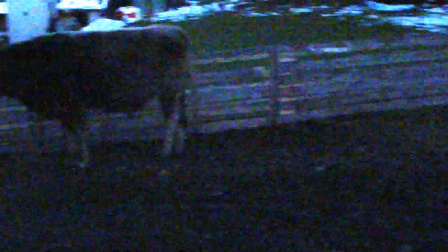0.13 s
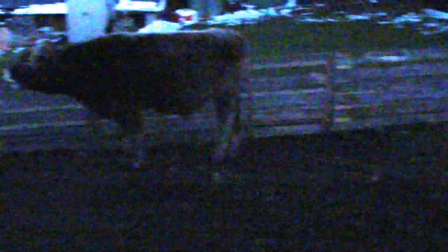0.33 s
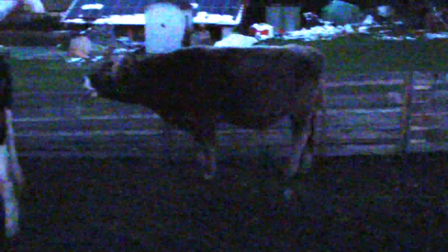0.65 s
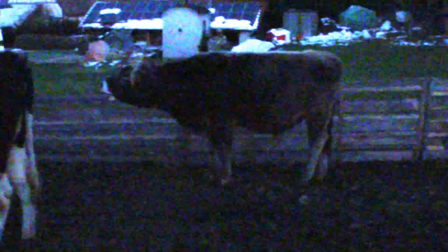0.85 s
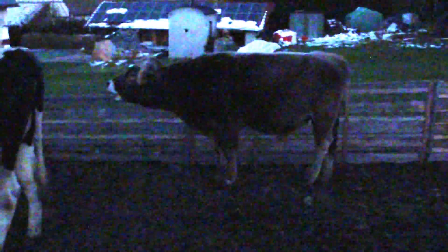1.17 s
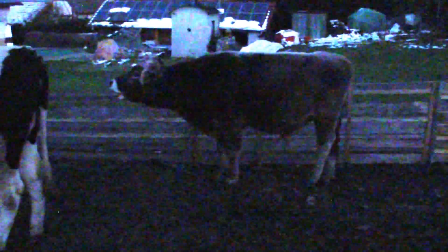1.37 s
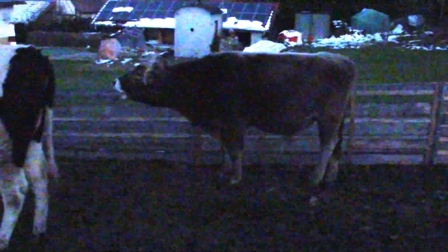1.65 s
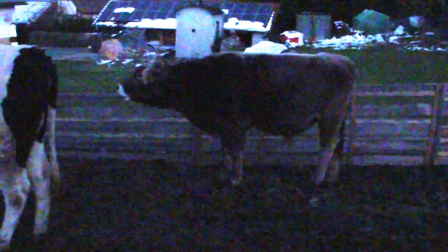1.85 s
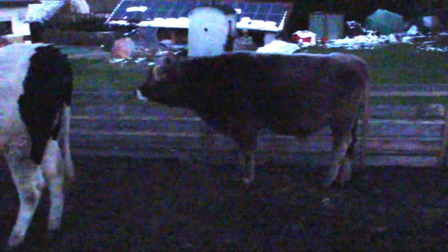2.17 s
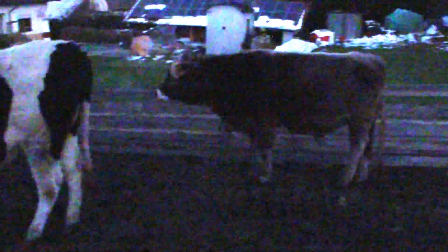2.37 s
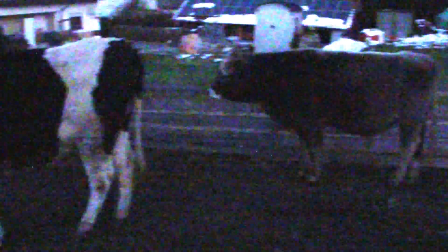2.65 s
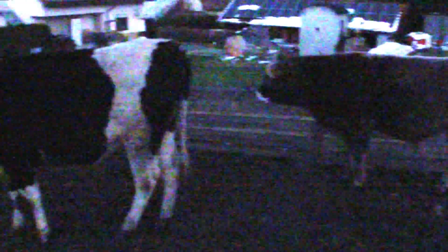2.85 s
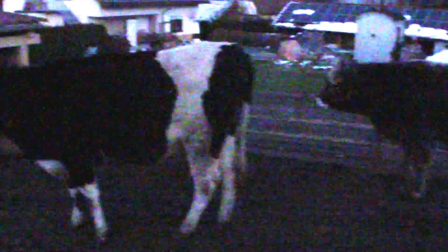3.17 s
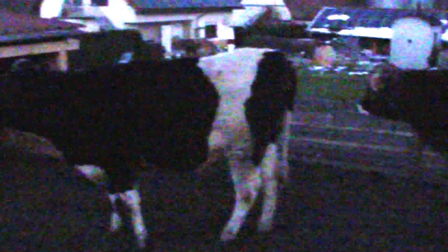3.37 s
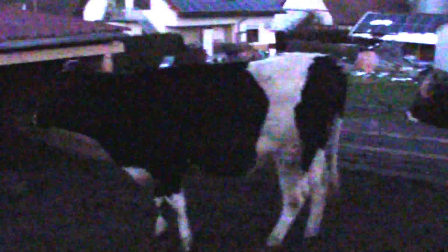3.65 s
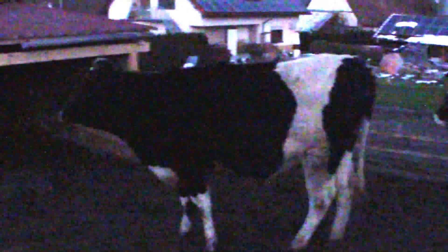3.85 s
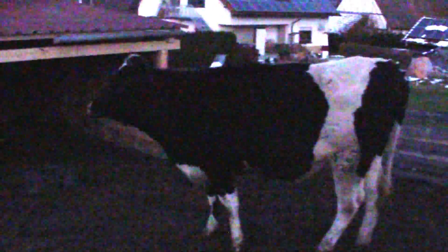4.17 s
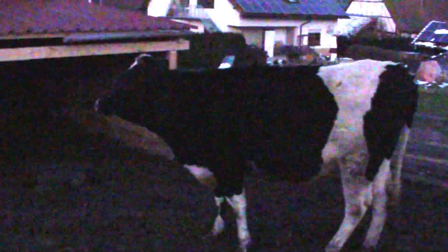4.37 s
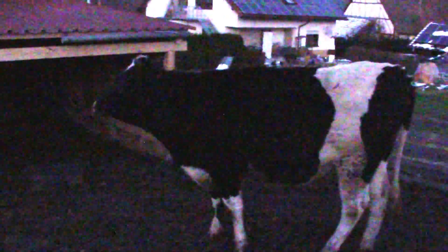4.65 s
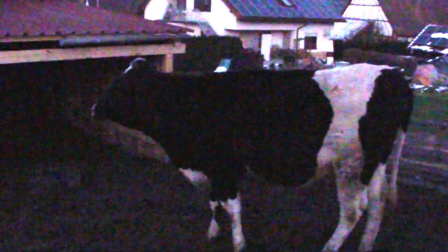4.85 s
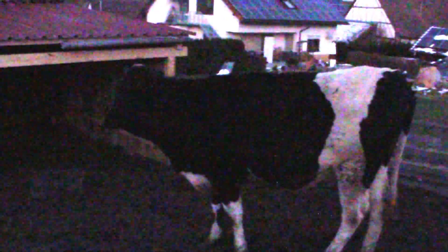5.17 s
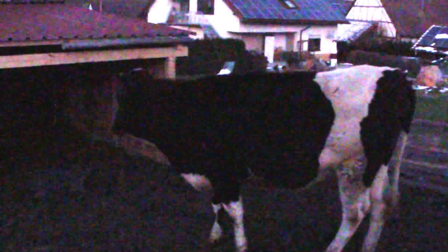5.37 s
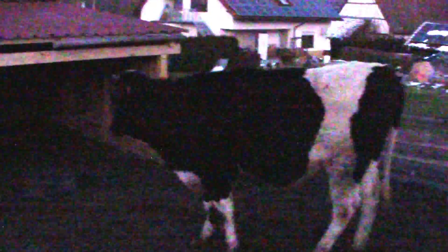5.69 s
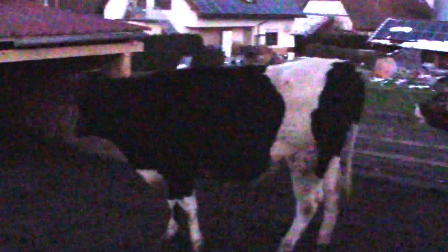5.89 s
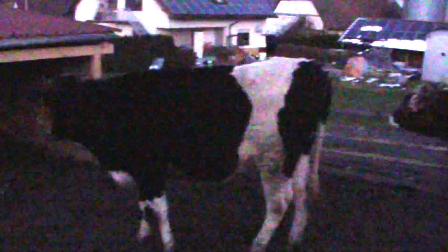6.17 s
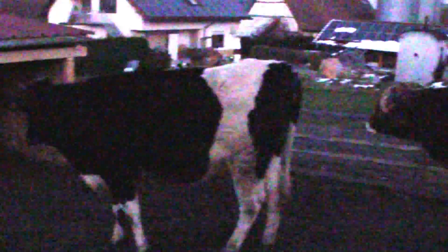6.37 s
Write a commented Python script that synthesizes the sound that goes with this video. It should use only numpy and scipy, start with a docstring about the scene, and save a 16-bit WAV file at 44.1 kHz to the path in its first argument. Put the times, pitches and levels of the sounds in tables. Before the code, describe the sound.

Outdoors in a quiet farmyard, one strong, slightly rough moo is already sounding at the start, climbs and falls away. After a pause with light hoof taps and tiny dry rustles comes another long moo, steadier on its high note, ending in a quick drop. Light echoes return from the surroundings. The stereo pickup is modest, with thin bass, hiss and a weak electronic whine.

```python
"""Two lows of a cow in an open farmyard at dusk, over a far traffic murmur, recorder hiss and a thin whine.
From 0 to 1.9 s the first moo glides up, holds and breaks off downward: partials of the vocal-fold pulse
shaped by throat resonances, with breath in the treble. Near 2.4 s hooves knock as decaying resonances;
short noise rustles fall between the calls. From 4.1 to 5.9 s the second moo opens with a faint hum and
follows the same course. Feedback loops return calls and knocks as echoes from walls and sheds."""
import sys
import numpy as np
from scipy import signal
from scipy.fft import rfft, irfft, next_fast_len
from scipy.io import wavfile
from scipy.ndimage import uniform_filter1d

SR = 44100
rng = np.random.default_rng(int(sys.argv[2]) if len(sys.argv) > 2 else 0)


def dump_mix(stems):
    """Bounce the given channels to the path in sys.argv[1] as a 16-bit WAV at rate SR."""
    frames = np.atleast_2d(stems).T  # one column per channel
    limited = np.clip(frames, -1, 1)  # hard clip at full scale
    pcm = np.round(limited * 32767).astype(np.int16)
    wavfile.write(sys.argv[1], SR, pcm)


N = 287840
TIME = np.arange(N) / SR

# spectrum of distant murmur below 3 kHz and hiss above: (frequency [Hz], relative density [dB per Hz])
AIR_SPECTRUM = [(30, -31), (70, -19.5), (150, -8), (350, -1), (520, 0.5), (720, 3.5), (950, -0.5),
                (1250, -5), (1800, -7), (2800, -14.5), (4500, -22.5), (6500, -18.5), (10000, -21.5),
                (13000, -27), (15500, -35)]
# course of murmur and hiss: (time [s], level [dB])
AIR_LEVEL = [(0, -38), (2.3, -49.5), (4.1, -50.5), (6.0, -48), (6.53, -48.5)]
# steady tones of the recorder electronics: (frequency [Hz], rms level [dB])
WHINE_TONES = [(6788, -87), (7800, -80), (7827, -81), (7849, -88), (15622, -100)]
# brief treble rustles: (time [s], standard deviation of the bell [s], rms level at its top [dB])
RUSTLE_EVENTS = [(2.05, .014, -53), (2.515, .005, -60), (3.28, .02, -65), (3.47, .012, -67),
                 (4.08, .006, -59)]
# hooves and small knocks: (time [s], level before decay and soft start [dB], ring [Hz], t60 [s])
KNOCK_EVENTS = [(2.398, -28, 450, 0.022), (2.4485, -38, 764, .02), (2.512, -32.5, 1280, 0.014),
                (2.5157, -27.5, 1950, 0.0064)]
# echoes of the yard: (frequency [Hz], t60 [s], gain [dB])
YARD_BANDS = [(100, 0.29, -26), (247, 0.83, -17), (603, 0.37, -13.5), (1318, 0.65, -20.5), (2700, 0.45, -4),
              (6000, 0.68, -17), (16000, .1, -17.5)]
# band stops of the recorder: (centre [Hz], width [Hz])
BAND_STOPS = [(3000, 1300), (4000, 1940), (5000, 670), (12000, 2100), (12400, 3000), (13500, 5800)]
# course of each moo: (time [s], pitch [Hz], ring level near 1.2 kHz [dB], chest partials [dB re ring],
# treble [dB re ring], lip resonance [Hz])
MOO_COURSES = [
    [(0.0, 147, -14, -2, -32, 6450), (0.02, 145.9, -21, -6, -44, 6700),
     (0.306, 168.1, -17.5, -0.5, -40, 6400), (0.348, 173.3, -17.5, -5.5, -39, 5970),
     (0.522, 180.2, -15.5, -3, -34.5, 5850), (0.582, 190.4, -16.5, -1.5, -33, 5870),
     (0.65, 194.2, -13.5, -7, -36.5, 6760), (0.746, 200.2, -16.5, -5.5, -39.5, 6580),
     (1.058, 206, -18, -3.5, -32.5, 6140), (1.364, 203.4, -16, -5.5, -34, 6230),
     (1.518, 193.7, -18, -7, -38.5, 6010), (1.614, 189, -18.5, -0.5, -27, 6060),
     (1.692, 175.1, -13, -10, -36, 6250), (1.734, 168, -18.5, -0.5, -35, 6100),
     (1.782, 141.9, -19.5, -2, -32.5, 6400), (1.84, 101.5, -23, -1, -27.5, 6670),
     (1.9, 84.4, -43, -3, -22, 6510)],
    [(4.12, 92.9, -70.5, 7, -6, 6420), (4.214, 128.4, -32.5, -3.5, -27.5, 6900),
     (4.284, 153.4, -19.5, -6, -36, 6540), (4.33, 167, -20, 0.5, -29.5, 6140),
     (4.364, 176.2, -16, -2, -35.5, 6040), (4.474, 196.2, -18, -1.5, -32, 6540),
     (4.536, 199.7, -17, -6.5, -33.5, 6900), (4.64, 208.2, -17, 1, -26.5, 6690),
     (4.816, 205.7, -16, -1.5, -28, 6610), (5.106, 209, -16.5, -3, -29.5, 6806),
     (5.232, 209.4, -16.5, -2, -26.5, 5980), (5.668, 205.1, -15.5, -5.5, -27.5, 6120),
     (5.744, 198.8, -18.5, -10, -32, 6060), (5.788, 193.5, -14.5, 0, -35, 6100),
     (5.808, 175.8, -17.5, -0.5, -24.5, 6270), (5.864, 117.1, -21.5, -6, -29, 6320),
     (5.92, 90.46, -35.5, 2, -29, 6290)],
]
# resonances with the mouth wide, one set a moo, widths before the skirt shaping in throat_gain:
# (centre [Hz], nominal width [Hz], gain [dB])
WIDE_MOUTHS = [
    [(537, 23, 3.5), (666, 58, 7), (976, 94, 6.5), (1221, 37.5, 16.5), (1585, 29, 5), (1785, 64, 5),
     (2386, 80, -12), (2500, 100, -55), (3480, 740, -45), (4650, 300, -43.5)],
    [(438, 210, -7), (671, 110, 0.5), (1051.3, 46, 9), (1205.4, 49.3, 7.5), (1709, 60, 1), (1978, 157, -11),
     (2360, 98, -11), (2830, 260, -27), (3720, 220, -30.5), (4650, 530, -45.5)],
]
# resonances with the mouth half open, at low pitch: (centre [Hz], nominal width [Hz], gain [dB])
HALF_OPEN_MOUTH = [(417, 270, -9.5), (708.5, 58, 1.5), (891, 93, -1.5), (1204, 48, 6.5), (1583, 65, -5.5),
                   (1857, 112, -2.5), (2340, 393, -20), (3830, 150, -45)]
# treble of buzz and breath: (frequency [Hz], relative density [dB per Hz])
BREATH_SPECTRUM = [(2500, -6.5), (3600, -22), (4600, -20.5), (5700, -2.5), (6900, -5.5), (8000, -10.5),
                   (9200, -7), (11000, -10.5), (13000, -28.5), (15500, -25)]
# moments when the voice catches; a negative drop is a rise:
# (time [s], standard deviation of the bell [s], added roughness [0-1], drop [dB])
VOICE_CATCHES = [(0.325, 0.022, .06, -0.5), (0.476, 0.0051, 0.17, 4.5), (0.545, 0.029, .25, 3),
                 (0.863, 0.0096, 0.39, 2.5), (1.114, 0.11, 0.17, -1), (1.633, 0.0096, .15, 4),
                 (4.995, 0.2, 0.05, 0), (5.801, 0.019, .12, 4.5)]
# character of each moo: (steady roughness [0-1], upper partials [dB re ring],
# first partial offset [dB], second partial offset [dB])
MOO_CHARACTERS = [(.04, -10, 0, 1), (0.11, -11.5, 2.5, 2)]
# strength of the lowest partials against pitch:
# (pitch [Hz], first partial [dB re ring], second partial [dB re ring])
LOW_PARTIAL_LEVELS = [(88, -32, -17), (129.6, -36, -5), (157, -27.5, -18), (164.6, -26, -24),
                      (181.2, -18.5, -14), (205.9, -10, -12.5), (212.2, -20, -11)]

AIR_LIKENESS = 0.25  # share of noise power common to both microphones
BASS_CUT_HZ, CUTOFF_HZ = 90, 15760
COW_LEFT_DB, HISS_LEFT_DB = 1, 2.5  # left above right: whole call, and further its treble
BUZZ_SHARE = .6  # share of treble power that follows the pitch as partials
LIPS_HALF_WIDTH_HZ, LIPS_DB = 56, 7.5  # boost in dB halves at this distance from the centre
OPEN_FROM_HZ, OPEN_AT_HZ = 177, 201.6  # pitches between which the mouth opens wide
ROUGH_PER_GLIDE = .035  # added roughness per octave a second
SECOND_DB_PER_RISE, UPPER_DB_PER_GLIDE = -2, 0.7  # dB per octave a second
LOW_WAVER_DB = 2.0  # rms waver of the two lowest partials
SWELL_S, SWELL_LENGTH_S, SWELL_DB = 4.57, 0.13, 5  # first partial of the second moo
HUM_FROM_S, HUM_TO_S, OPENING_S = 4.1, 4.222, .022  # closed lips, and the time they take to part
HUM_DB, HUM_LOW_DB = -54, 14  # ring level of the hum; boost of its two lowest partials
LEFT_RIGHT = np.array([[.5], [-.5]])


def from_db(db):
    """Amplitude gain is a power of ten of level over 20 dB."""
    return 10 ** (np.asarray(db) / 20)


def rms_one(x):
    """Normalisation divides a signal by its root mean square."""
    return x / np.sqrt(np.mean(x ** 2) + 1e-20)


def at_hz(points, hz, column=1):
    """Interpolation on a logarithmic frequency axis reads a table column."""
    points = np.array(points)
    return np.interp(np.log(hz + 1), np.log(points[:, 0]), points[:, column])


def drift(rate_hz, size):
    """Two equal poles smooth white noise into a slow random course of rms 1."""
    r = np.exp(-2 * np.pi * rate_hz / SR)
    noise = rng.standard_normal(size + SR)
    return rms_one(signal.lfilter([1], [1, -2 * r, r * r], noise)[SR:])  # filter settles first


def running_rms(x):
    """A moving mean of power over 34 ms, a few pitch cycles, gives the level."""
    return np.sqrt(uniform_filter1d(x ** 2, size=1500) + 1e-12)


def coloured(spectrum, channels):
    """Spectral weighting of white noise gives coloured noise of rms 1."""
    size = next_fast_len(N)
    gain = from_db(at_hz(spectrum, np.fft.rfftfreq(size, 1 / SR)))
    white = rng.standard_normal((channels, size))
    return rms_one(irfft(rfft(white) * gain, size)[:, :N])


def above(hz, edge_hz):
    """A linear crossover 100 Hz wide steps from 0 to 1 at an edge."""
    return np.clip((hz - edge_hz) / 100 + .5, 0, 1)


def bump(t, s, length):
    """A Gaussian bell marks a brief moment."""
    return np.exp(-.5 * ((t - s) / length) ** 2)


def air():
    """Partly correlated noise makes a wavering distant murmur and hiss; steady sines add whine."""
    noise = coloured(AIR_SPECTRUM, channels=3)
    murmur = np.sqrt(AIR_LIKENESS) * noise[0] + np.sqrt(1 - AIR_LIKENESS) * noise[1:]
    level_db = np.interp(TIME, *np.transpose(AIR_LEVEL)) + drift(3.8, size=N)
    whine = sum(from_db(db) * np.sqrt(2) * np.sin(2 * np.pi * hz * TIME) for hz, db in WHINE_TONES)
    return from_db(level_db) * murmur + whine


def rustles():
    """Bell-shaped envelopes gate bright noise into short puffs."""
    swell = sum(from_db(db) * bump(TIME, s, length) for s, length, db in RUSTLE_EVENTS)
    return swell * coloured([(2000, -30), (5000, 17), (10000, 15), (16000, -34)], channels=2)


def yard(x):
    """Recirculating delays, two dozen a side, echo as between buildings; each band has its own decay."""
    size = next_fast_len(N + SR)
    hz = np.fft.rfftfreq(size, 1 / SR)
    t60 = at_hz(YARD_BANDS, hz)
    echoes = np.zeros((2, len(hz)), complex)
    for k, lag in enumerate(rng.uniform(.025, .13, 48)):
        loop = from_db(-60 * lag / t60) * np.exp(-2j * np.pi * hz * lag)
        echoes[k % 2] += (-1) ** (k // 2) * loop / (1 - loop)
    apart = hz / np.hypot(hz, 900)  # long waves reach both microphones alike
    echoes = echoes.mean(axis=0) + 0.28 * apart * (echoes - echoes[::-1])
    gain = from_db(at_hz(YARD_BANDS, hz, column=2))
    return irfft(rfft(x, size) * echoes * gain, size)[:, :N]


def knocks():
    """A damped resonance, with a soft start, sounds each hoof or small knock."""
    out = np.zeros(N)
    for s, db, hz, t60 in KNOCK_EVENTS:
        age = np.clip(TIME - s, 0, None)
        onset = 1 - np.exp(-1.5 * hz * age)
        out += from_db(db - 60 * age / t60) * np.sin(2 * np.pi * hz * age) * onset
    return out


def throat_gain(modes, hz):
    """Parallel resonances of alternating sign and steep skirts leave deep valleys between peaks."""
    total = 0
    for k, (centre_hz, width_hz, db) in enumerate(modes):
        detuning = (hz - centre_hz ** 2 / hz) / width_hz
        total = total + (-1) ** k * from_db(db) / (1 + .7j * detuning) ** 1.267
    return total


def voiced_bands(t, hz, phase, wide, modes):
    """Source-filter principle: the mouth shapes harmonics, which are summed as chest, middle and upper."""
    chest, middle, upper = np.zeros((3, len(t)))
    coarse, coarse_hz, coarse_wide = t[::64], hz[::64], wide[::64]
    for k in range(3, 36):
        shape = coarse_wide * throat_gain(modes, k * coarse_hz)
        shape = shape + (1 - coarse_wide) * throat_gain(HALF_OPEN_MOUTH, k * coarse_hz)
        # each partial wavers at 12 Hz on its own (one point in 64), high ones more
        shape *= from_db(0.28 * k * drift(64 * 12, size=len(shape)))
        gain = np.interp(t, coarse, shape.real) + 1j * np.interp(t, coarse, shape.imag)
        # a quadratic phase smears the pulse
        partial = np.real(gain * np.exp(1j * (k * phase + .28 * k * k)))
        chest += partial * (1 - above(k * hz, 790))
        middle += partial * (above(k * hz, 834) - above(k * hz, 1500))
        upper += partial * (above(k * hz, 1500) - above(k * hz, 4900))
    return chest, middle, upper


def rasp(puff, wide, modes):
    """Pulsed turbulence at the folds excites the same mouth resonances with noise."""
    size = next_fast_len(len(puff))
    hz = np.fft.rfftfreq(size, 1 / SR) + 1
    puffs = rfft(puff * rng.standard_normal(len(puff)), size)
    puffs = puffs * (hz / 1000) ** 0.36 / (1 + (220 / hz) ** 4) / (1 + (hz / 3600) ** 6)
    total = 0
    for part, shape in [(wide, modes), (1 - wide, HALF_OPEN_MOUTH)]:
        total = total + part * rms_one(irfft(puffs * throat_gain(shape, hz), size)[:len(puff)])
    return total


def lips(x, t, centre_hz):
    """A moving resonance boosts the treble while the time-frequency bands flicker a little."""
    hz, s, frames = signal.stft(x, SR, nperseg=512)
    off = (hz[:, None] - np.interp(s + t[0], t, centre_hz)) / LIPS_HALF_WIDTH_HZ
    flicker = uniform_filter1d(rng.standard_normal(off.shape), size=7, axis=0)
    flicker = uniform_filter1d(flicker, size=14, axis=1)
    gain_db = LIPS_DB / (1 + off ** 2) + 2.7 * rms_one(flicker)
    return signal.istft(frames * from_db(gain_db), SR)[1][:, :len(t)]


def treble(t, span, hz, phase, puff, lips_hz):
    """High harmonics buzz beside air noise modulated once a pitch cycle; the lips filter both."""
    buzz = np.zeros(len(t))
    for k, start in enumerate(rng.uniform(-2.0, 2.1, 60), 20):
        gain = np.interp(t, t[::64], from_db(at_hz(BREATH_SPECTRUM, k * hz[::64])))
        buzz += gain * above(k * hz, 4000) * np.cos(k * phase + start)
    noise = coloured(BREATH_SPECTRUM, channels=3)[:, span]
    breath = rms_one(.4 + puff) * (noise[0] + .8 * noise[1:])
    mix = np.sqrt(BUZZ_SHARE) * buzz / running_rms(buzz) + np.sqrt(1 - BUZZ_SHARE) * breath
    return lips(mix, t, lips_hz)


def moo(rows, modes, character):
    """Self-oscillating folds give harmonics of the pitch; uneven beats and pulsed air roughen them."""
    s, *columns = np.transpose(rows)
    span = slice(round(s[0] * SR), round(s[-1] * SR))
    t = TIME[span]
    hz, voice_db, chest_db, treble_db, lips_hz = [np.interp(t, s, c) for c in columns]
    steady, upper_db, *low_db = character

    closed = (t > HUM_FROM_S) * np.clip((HUM_TO_S - t) / OPENING_S, 0, 1)
    voice_db = voice_db + (HUM_DB - voice_db) * closed
    glide = uniform_filter1d(np.gradient(np.log2(hz)) * SR, size=2000)  # octaves a second
    rough = steady + ROUGH_PER_GLIDE * np.abs(glide)
    for when, length, more, drop_db in VOICE_CATCHES:
        rough = rough + more * bump(t, when, length)
        voice_db = voice_db - drop_db * bump(t, when, length)
    rough = np.clip(rough, 0, 1)

    # the two lowest partials have levels of their own
    first_db, second_db = [
        voice_db + low_db[c - 1] + HUM_LOW_DB * closed + at_hz(LOW_PARTIAL_LEVELS, hz, column=c)
        + LOW_WAVER_DB * drift(8, size=len(t)) for c in (1, 2)]
    first_db += SWELL_DB * bump(t, SWELL_S, SWELL_LENGTH_S)
    second_db += SECOND_DB_PER_RISE * np.maximum(glide, 0)

    wide = np.clip((hz - OPEN_FROM_HZ) / (OPEN_AT_HZ - OPEN_FROM_HZ), 0, 1)
    uneven_hz = hz * (1 + .04 * rough * drift(60, size=len(t)))
    phase = 2 * np.pi * np.cumsum(uneven_hz) / SR
    puff = (1 + np.cos(phase)) ** 0.44  # the folds open once a cycle

    bands = voiced_bands(t, hz, phase, wide, modes)
    levels_db = chest_db, 0, upper_db + UPPER_DB_PER_GLIDE * glide
    tone = sum(from_db(db) * band / running_rms(band) for db, band in zip(levels_db, bands))
    tone = tone * from_db(3 * rough * drift(60, size=len(t)))
    voice = from_db(voice_db) * (tone + 1.7 * rough * rasp(puff, wide, modes))
    low = from_db(first_db) * np.cos(phase) + from_db(second_db) * np.cos(2 * phase + 0.5)
    voice += np.sqrt(2) * low

    hiss_db = voice_db + treble_db + 0.23 * drift(20, size=len(t)) + HISS_LEFT_DB * LEFT_RIGHT
    hiss = treble(t, span, hz, phase, puff, lips_hz) * from_db(hiss_db)
    fade = np.clip(np.minimum(t - t[0], t[-1] - t) / 0.0078, 0, 1)
    out = np.zeros((2, N))
    out[:, span] = (hiss + voice) * from_db(COW_LEFT_DB * LEFT_RIGHT) * fade
    return out


def scene():
    """Superposition adds calls and knocks, their echoes, rustles and the evening air."""
    near = sum(map(moo, MOO_COURSES, WIDE_MOUTHS, MOO_CHARACTERS)) + knocks()
    return near + yard(near) + rustles() + air()


def record(dry):
    """Linear filtering in the recorder thins the bass, notches several bands and cuts the top."""
    out = signal.sosfilt(signal.butter(2, BASS_CUT_HZ, "high", fs=SR, output="sos"), dry)
    for hz, width_hz in BAND_STOPS:
        out = signal.lfilter(*signal.iirnotch(hz, hz / width_hz, SR), out)
    return signal.sosfilt(signal.ellip(12, .5, 60, CUTOFF_HZ, fs=SR, output="sos"), out)


dry = scene()
out = record(dry)
dump_mix(out)
```